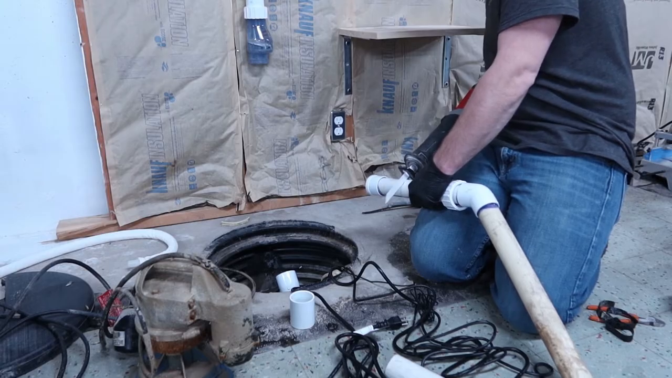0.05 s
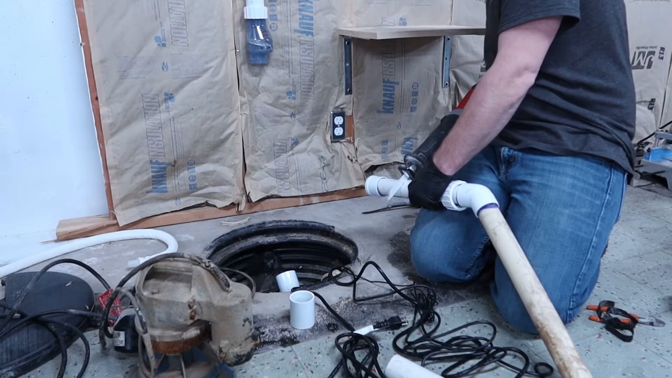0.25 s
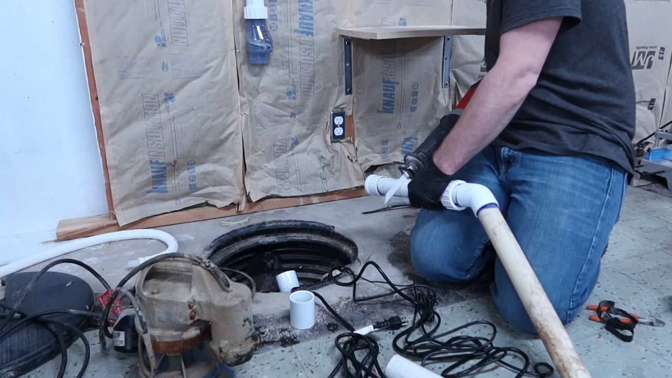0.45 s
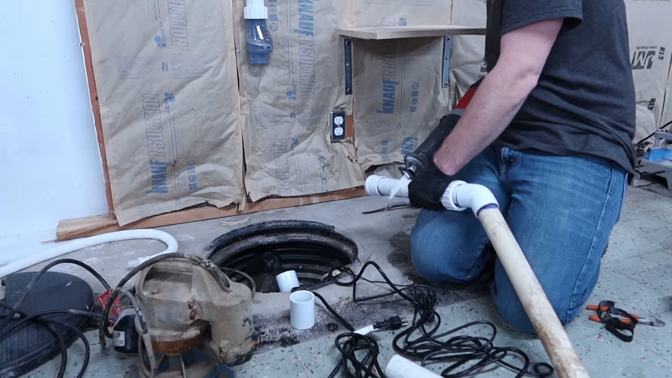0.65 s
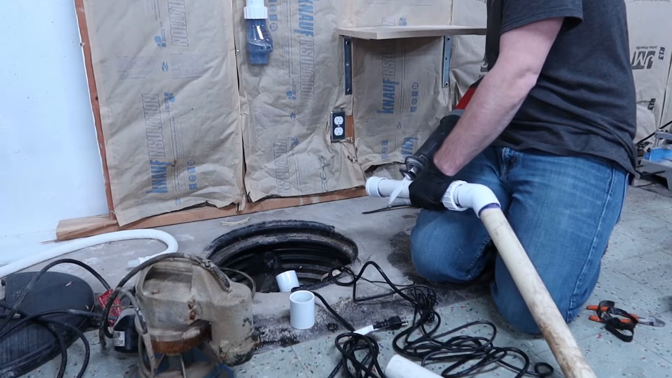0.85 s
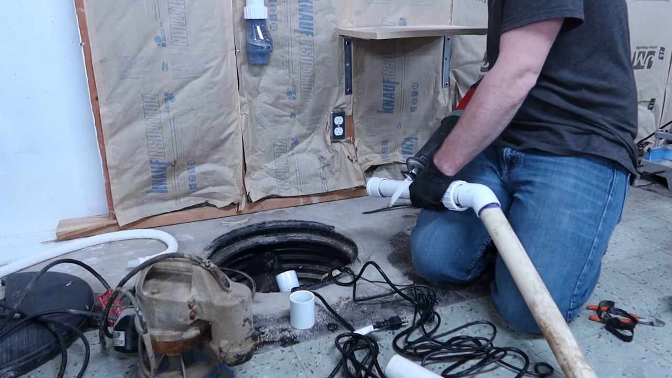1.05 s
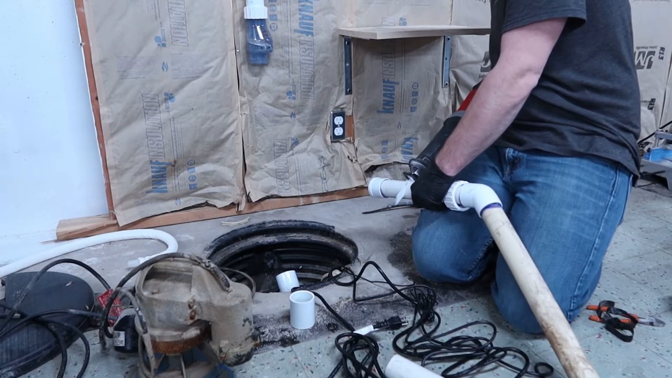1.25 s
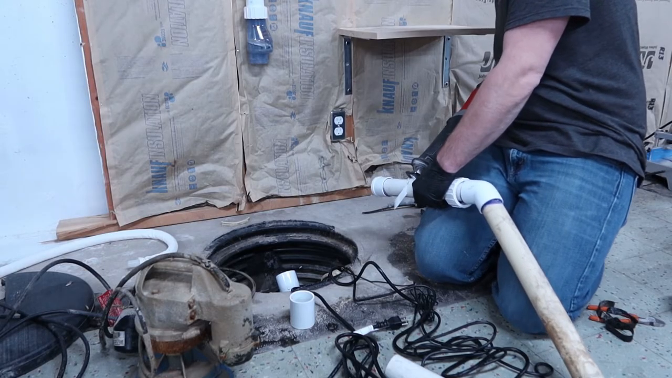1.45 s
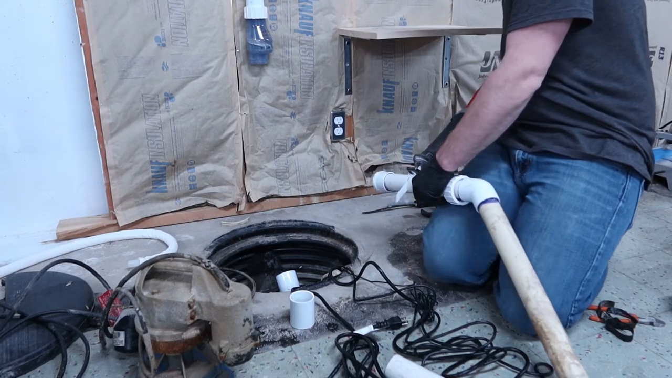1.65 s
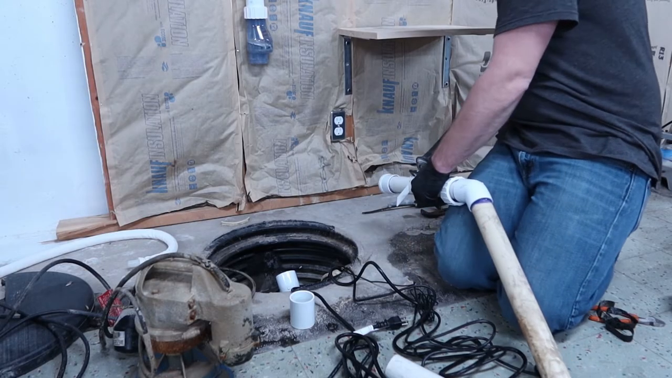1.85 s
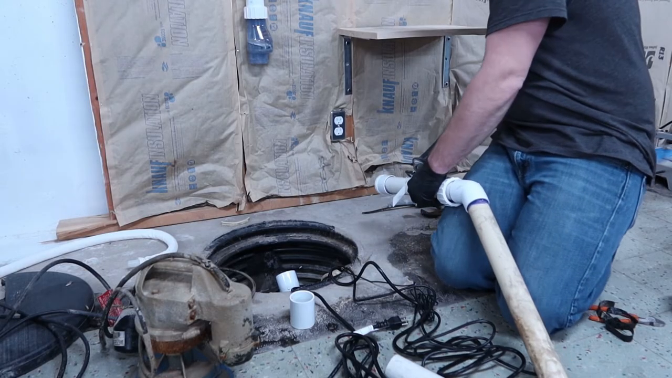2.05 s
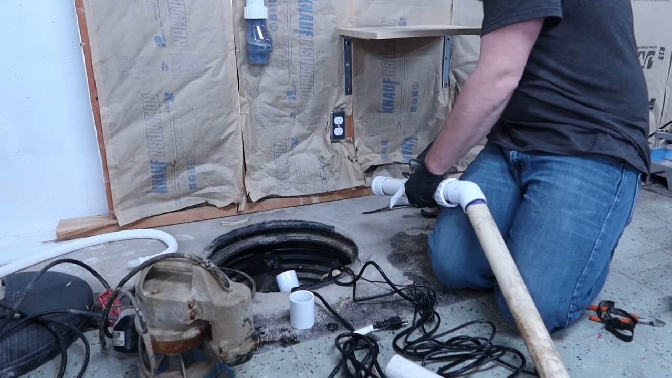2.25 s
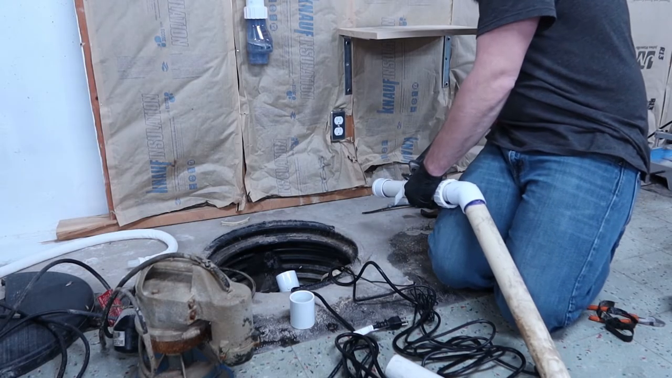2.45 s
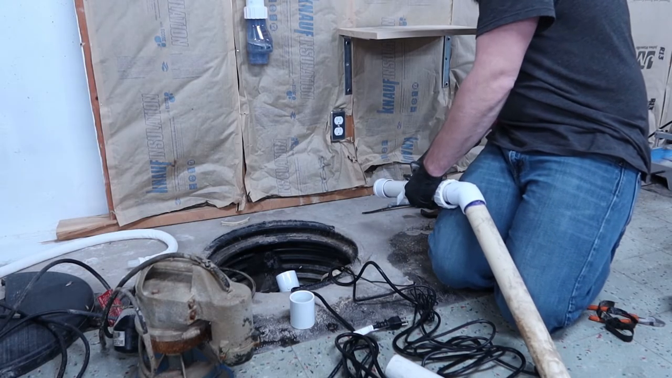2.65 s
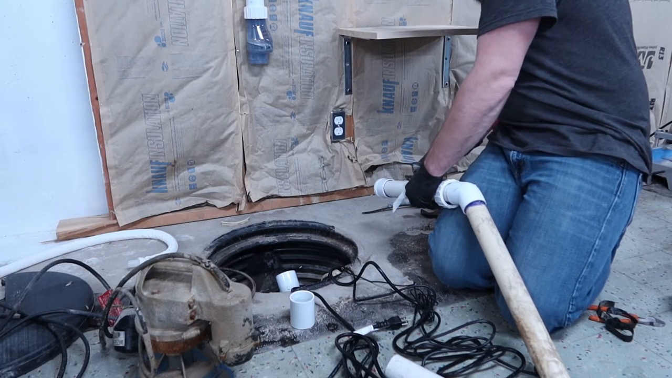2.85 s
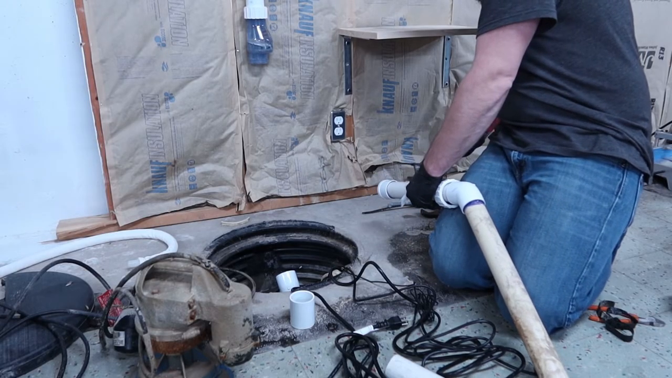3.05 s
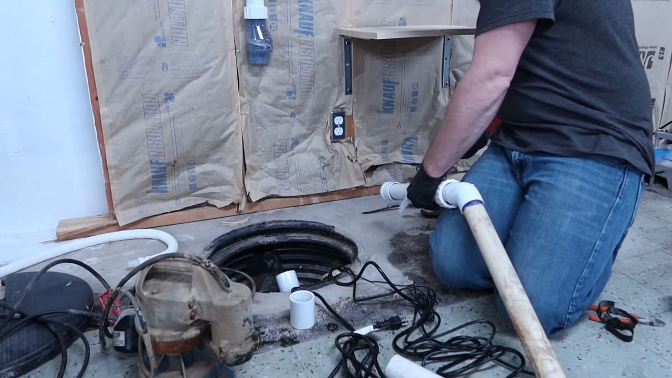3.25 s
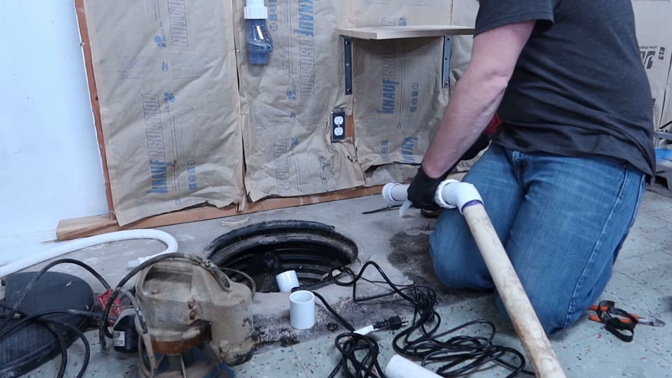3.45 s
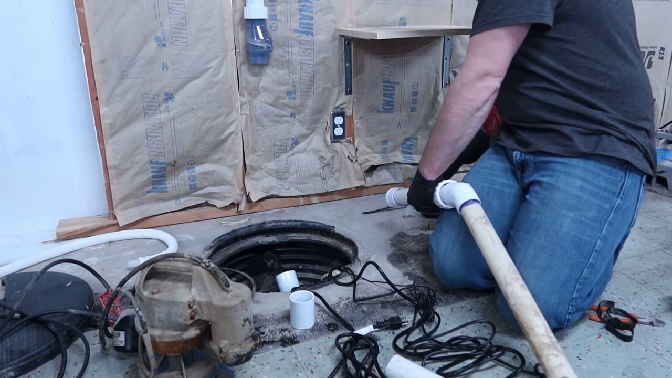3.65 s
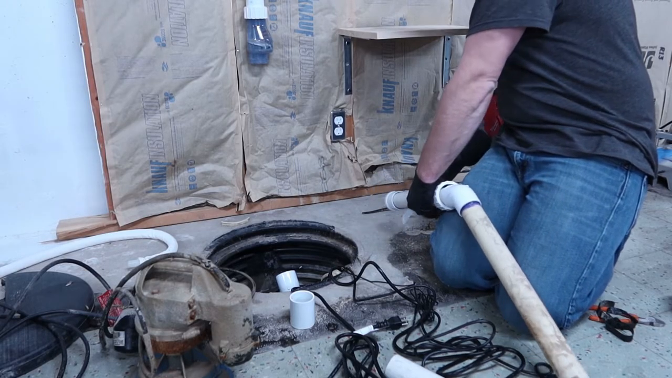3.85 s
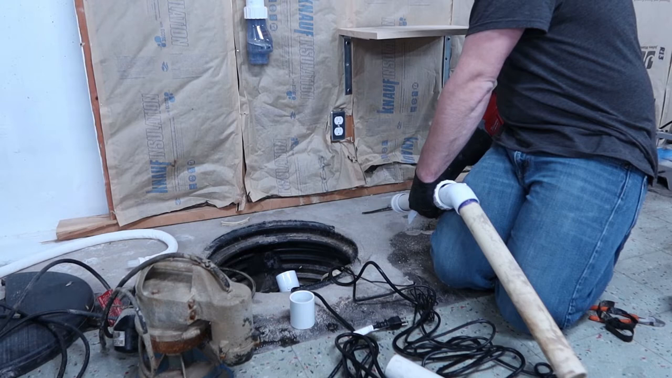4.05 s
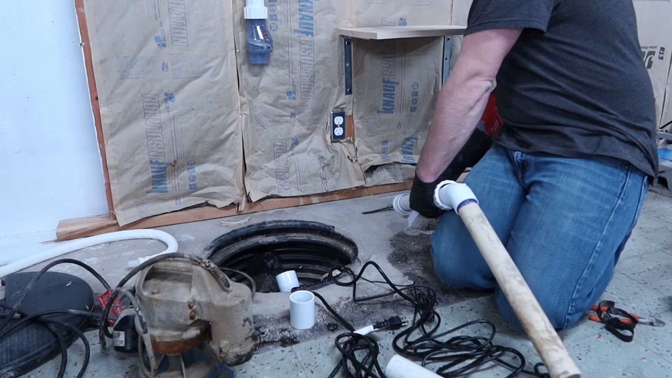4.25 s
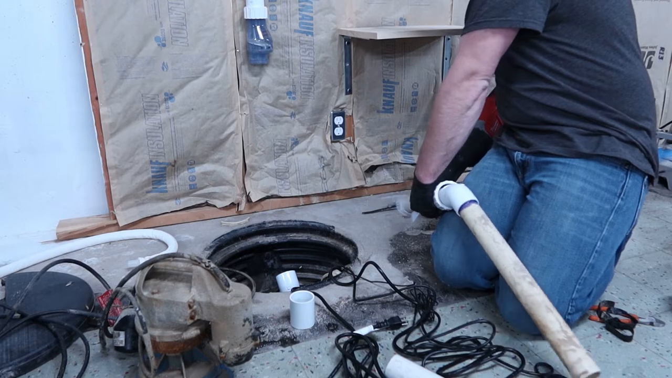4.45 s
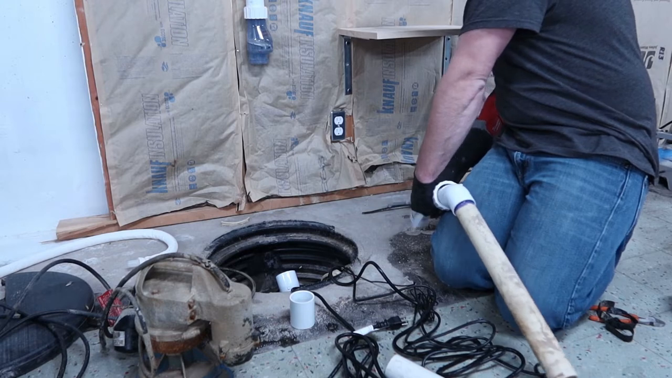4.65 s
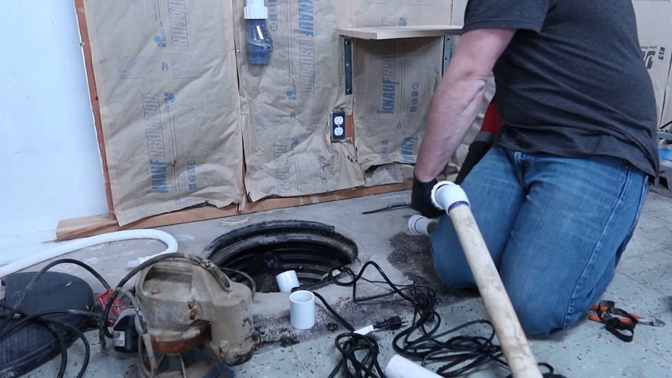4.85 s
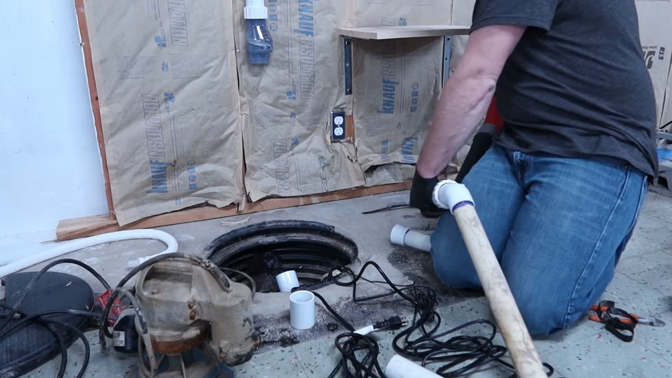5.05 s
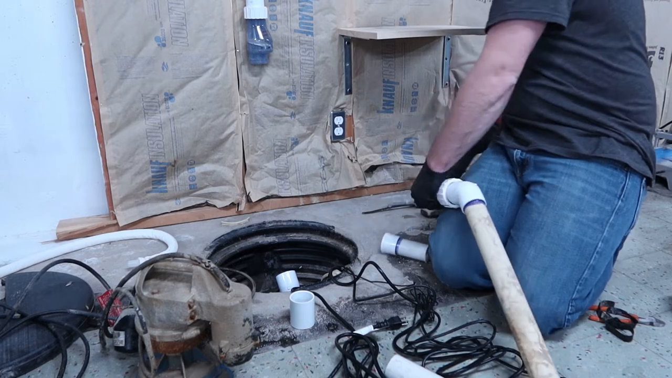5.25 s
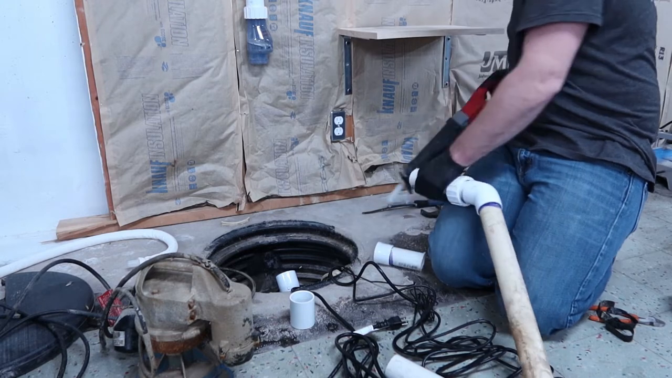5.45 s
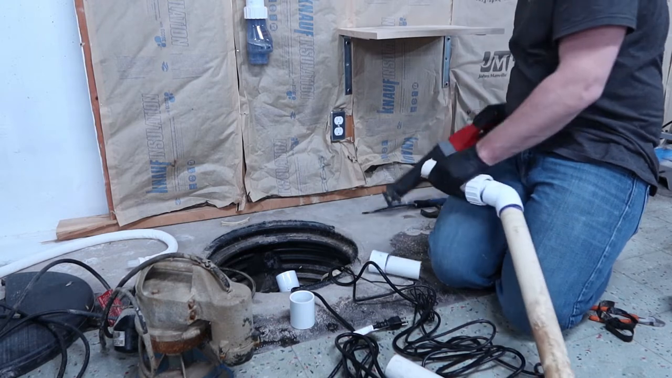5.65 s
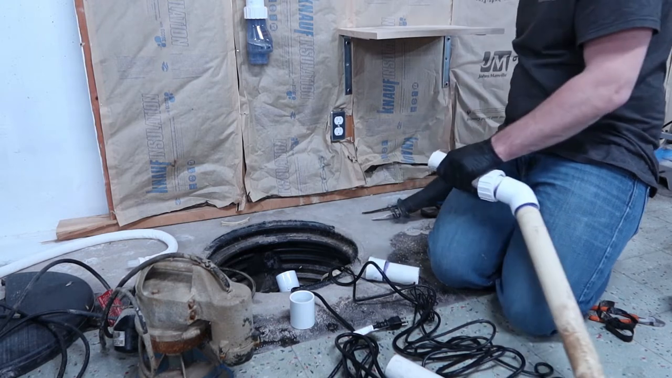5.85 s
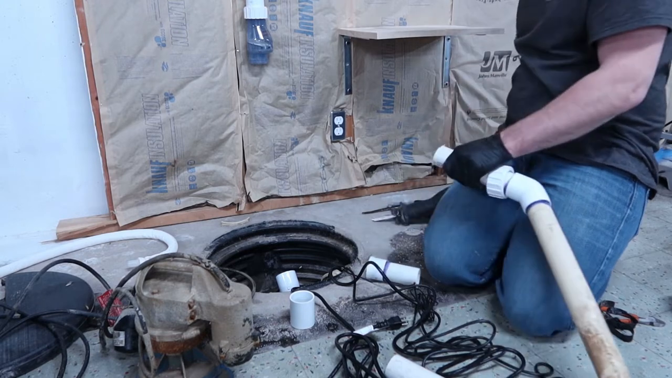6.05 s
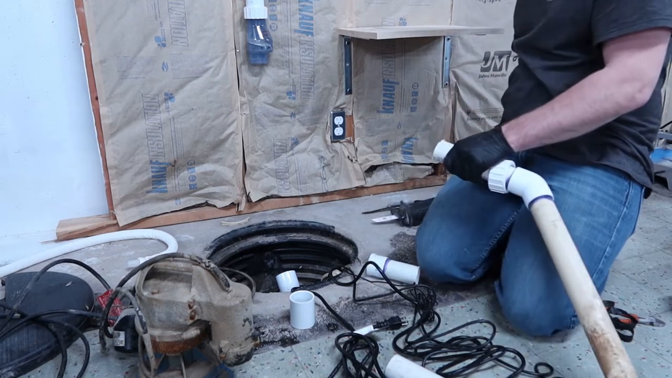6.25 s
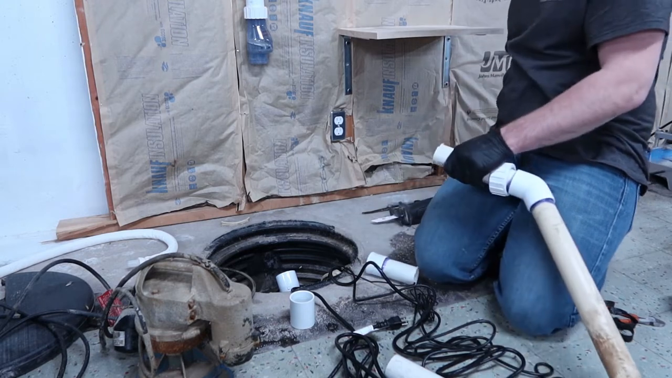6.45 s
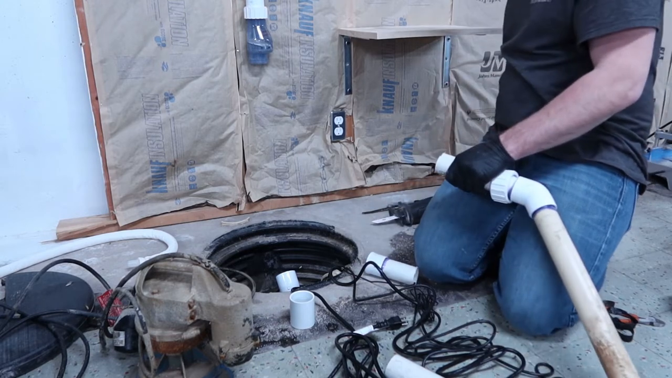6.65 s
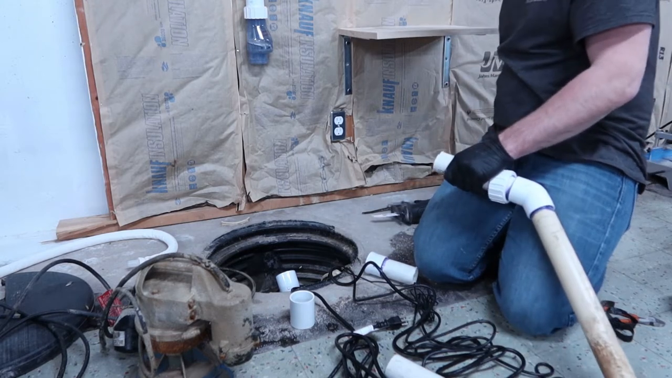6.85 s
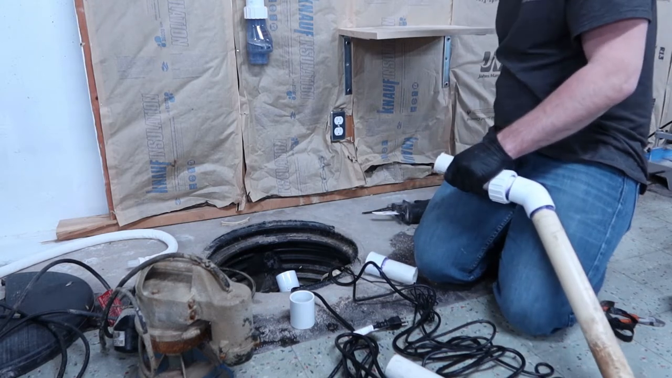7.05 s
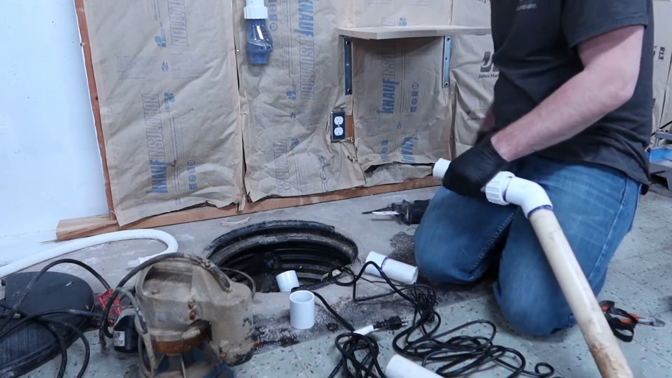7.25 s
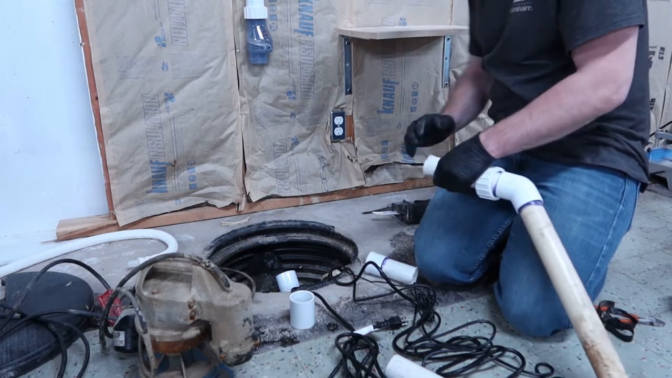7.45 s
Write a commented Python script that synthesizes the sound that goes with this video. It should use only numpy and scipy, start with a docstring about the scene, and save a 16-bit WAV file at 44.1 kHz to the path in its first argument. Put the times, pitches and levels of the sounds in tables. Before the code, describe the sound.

Close, loud power-saw strokes chew plastic pipe in a basement, stop, restart twice, then the saw is set down and pipe pieces are handled.

```python
"""A reciprocating saw is already cutting a plastic pipe in a basement: the motor growls and whirrs, each pull
stroke rasps and rings the wall. Three runs; then the saw is laid on concrete, the pipe knocked and handled.
Motor, rasp, drag and rubbing: filtered noise and random clicks. Impacts: clicks into decaying modes.
Squeaks and speed-control whine: sines. Reflections on the contact sounds, steady room tone, microphone."""
import sys
import numpy as np
from scipy import signal
from scipy.fft import rfft, irfft, next_fast_len
from scipy.io import wavfile
from scipy.ndimage import uniform_filter1d

SR = 44100
rng = np.random.default_rng(int(sys.argv[2]) if len(sys.argv) > 2 else 0)


def master_out(mix):
    """Clip the mix to full scale and print it as 16-bit PCM to the path in sys.argv[1]."""
    frames = np.transpose(np.atleast_2d(mix))
    ceiling = np.clip(frames, -1, 1)
    pcm = np.round(ceiling * 32767).astype(np.int16)
    wavfile.write(sys.argv[1], SR, pcm)


N = 331191

# room tone spectrum: f/Hz, relative density/dB
ROOM_TONE_SPECTRUM = [(20, 1), (60, 2), (130, -5.5), (200, -7), (245, -2.5), (300, -7), (500, -7),
                      (1000, -14.5), (1600, -18.5), (3000, -20.5), (8000, -21.5), (11000, -21.5),
                      (15800, -32.5)]
ROOM_TONE_DB = -54

# trigger runs: full speed reached t/s, trigger released t/s
TRIGGER_RUNS = [(-.5, 1.751), (2.506, 4.1), (4.462, 5.1)]
SPIN_UP_DB_PER_S, COAST_DB_PER_S, WHIRR_DB_PER_SPEED_DB = 424, 127, 1.24
POWER_OFF_DROP_DB, POWER_OFF_TAU_S = 5, 0.011

# motor and gears under load, at full speed: t/s, growl level/dB, whirr level/dB
MOTOR_LEVELS = [(0, -18.5, -24), (.55, -22.5, -22), (1.0, -23.5, -27.5), (1.72, -30.5, -26),
                (2.51, -23.5, -28), (2.7, -26.5, -24), (3.6, -22, -22.5), (4.07, -25.5, -28.5),
                (4.46, -21.5, -25), (4.52, -18.5, -17), (4.57, -26, -25), (4.68, -17.5, -15.5),
                (4.85, -24, -21.5), (5.1, -27.5, -27)]
# growl spectrum: f/Hz, relative density/dB
GROWL_SPECTRUM = [(35, -65.5), (60, -34.5), (219, -40), (289, -11.5), (457, -3), (938, 3), (1120, 2),
                  (1320, 3), (1660, -1.5), (1900, 1), (3000, -6), (3900, -16.5), (6600, -120)]
# whirr spectrum: f/Hz, relative density/dB
WHIRR_SPECTRUM = [(1180, -58), (2000, -2.5), (2340, 4), (5160, 5.5), (6390, 5.5), (8490, 1), (10300, -4),
                  (13200, -5.5), (15600, -15.5)]
# low hum of the motor and pipe notes shaken by the saw: f/Hz, start t/s, end t/s, level re growl/dB
SHAKEN_NOTES = [(203.8, 0.54, 2.7, -18), (405.6, 0.29, 1.8, -14.5), (434, 2.7, 3.45, -3),
                (238, 4, 4.57, -10)]
SHAKE_FADE_DB_PER_S, SHAKE_SWING_DB = 17, 10

# cutting strokes: t/s, level/dB, length/s, wall ring f/Hz
CUT_STROKES = [(0.043, -4, 0.033, 1450), (0.076, -0.5, 0.012, 1520), (0.153, 2, 0.022, 1480),
               (0.234, -1.5, 0.031, 1475), (0.336, -3, 0.039, 1400), (0.416, 1.5, 0.012, 1430),
               (0.478, -1.5, 0.026, 1370), (0.559, 4, 0.0095, 1410), (0.632, 0, 0.028, 1370),
               (0.711, 1.5, 0.023, 1470), (0.784, 0, 0.027, 1400), (0.859, 1, 0.023, 1170),
               (0.941, 1.5, 0.019, 1370), (1.016, -1.5, 0.032, 1310), (1.095, 0.5, 0.026, 1350),
               (1.174, -1, 0.032, 1320), (1.253, 0, 0.026, 1310), (1.328, 1, 0.027, 1280),
               (1.408, 1.5, 0.02, 1330), (1.48, 1.5, 0.024, 1220), (1.548, 1.5, 0.026, 1400),
               (1.622, 2, 0.02, 1440), (1.687, 0.5, 0.026, 1410), (2.508, -12, 0.022, 1440),
               (2.523, -5, 0.018, 1380), (2.538, -3, 0.02, 1360), (2.592, -5.5, 0.033, 1130),
               (2.628, -2, 0.033, 1350), (2.719, 0, 0.02, 1300), (2.797, -2.5, 0.027, 1260),
               (2.882, -2.5, 0.024, 1390), (2.962, -2, 0.023, 1300), (3.041, -2, 0.025, 1330),
               (3.116, -2.5, 0.028, 1310), (3.193, -2.5, 0.027, 1410), (3.268, -3, 0.024, 1280),
               (3.341, -2.5, 0.028, 1400), (3.417, -2, 0.019, 1350), (3.485, -1.5, 0.021, 1220),
               (3.551, -2.5, 0.031, 1250), (3.626, -1, 0.023, 1530), (3.706, 0, 0.025, 1520),
               (3.795, -1, 0.024, 1650), (3.877, -0.5, 0.021, 1550), (3.971, -4, 0.022, 1490),
               (4.041, -1.5, 0.023, 1480), (4.475, -3.5, 0.016, 1590), (4.668, -7, 0.04, 1460)]
# timbre as the cut deepens, re stroke level:
# t/s, wall ring level/dB, hollow level/dB, upper ring level/dB, rasp level/dB, low jolt level/dB
CUT_BALANCE = [(0, -10.5, -47, -30, -40, -28), (.55, -14.5, -23.5, -19.5, -28.5, -33.5),
               (.85, -12.5, -24.5, -19, -21, -33.5), (1.1, -9.5, -26, -14, -19.5, -57),
               (1.7, -12.5, -31.5, -17, -23, -46), (2.5, -8, -26, -9.5, -19.5, -36.5),
               (3.452, -10, -17, -10.5, -19, -52.5), (3.62, -17.5, -20.5, -11, -19, -37.5),
               (4.049, -17, -22.5, -17, -26, -36.5), (4.7, -45, -19.5, -19, -23.5, -35.5)]
# broad resonances of rasp, blade and wall together: f/Hz, width/Hz, level/dB
RASP_RESONANCES = [(2795, 600, 4), (3584, 760, 3.5), (5330, 2200, 1.5), (8270, 1300, 0.5),
                   (12100, 1400, -13)]
# air and wall notes of the pipe: f/Hz, width/Hz, level/dB
HOLLOW_NOTES = [(453.4, 67, -11), (562, 218, 6.5), (721.5, 110, -5)]
# wall ring broadens once the blade is through: t/s, width/Hz
WALL_RING_WIDTH = [(0, 170), (.9, 340), (4.7, 380)]
# low jolt drops as the pipe comes loose: t/s, f/Hz
JOLT_PITCH = [(0, 147), (3.5, 140), (3.7, 100), (4.7, 110)]
UPPER_RING_HZ, UPPER_RING_WIDTH_HZ, JOLT_WIDTH_HZ, RING_SCATTER_DB = 1952, 590, 51, 1.2
BITE_S, RELEASE_POWER = .006, 4
JUDDER_PER_S, JUDDER_DB = 110, 1.8   # teeth catch unevenly within a stroke

# blade dragging in the kerf, at full speed: t/s, level/dB
DRAG_LEVEL = [(0, -23), (.7, -22), (1.1, -30.5), (2.5, -35), (4.05, -32.5), (4.3, -72)]
# notes the drag rings: f/Hz, width/Hz, level/dB
DRAG_RESONANCES = [(1143, 240, -5), (1550, 160, -1.5), (2950, 530, -2.5), (3675, 190, -9), (6190, 1800, -9)]
RETURN_LEAD_S, RETURN_HALF_S, RETURN_DB, RETURN_HZ, RETURN_WIDTH_HZ = 0.017, .014, -31.5, 1150, 420

# handling ticks, gloves on plastic: t/s, squeak level/dB, squeak f/Hz, bright snap level/dB
HANDLING_TICKS = [(2.295, -38.5, 1420, -61), (2.302, -43, 1080, -75), (2.339, -47, 1067, -63),
                  (2.395, -62, 1130, -48), (4.2934, -62, 1390, -47), (4.307, -59, 1015, -49),
                  (4.352, -64, 1480, -53), (4.384, -38.5, 1110, -50), (5.158, -49, 1480, -41),
                  (5.21, -46, 1070, -65), (5.253, -55, 1060, -53), (5.3678, -54, 1010, -46.5),
                  (5.4116, -42, 1080, -47), (5.443, -49, 967, -50), (5.5342, -52, 1090, -50),
                  (5.5466, -46.5, 1120, -75), (5.6281, -48, 1080, -61), (5.724, -42.5, 1088, -49),
                  (6.326, -62, 1440, -49), (6.3526, -44, 1120, -56), (6.379, -48, 1115, -70.5),
                  (6.4245, -52, 1056, -68), (6.4694, -51.5, 1130, -72.5), (6.9357, -49, 1144, -50),
                  (7.173, -39, 1144, -54.5), (7.4476, -45, 1120, -53), (7.479, -57, 1130, -53.5)]
# snap modes: f/Hz, level/dB, t60/s
SNAP_MODES = [(1942, 1, .04), (3045, 1, .025)]
SQUEAK_S, SQUEAK_SAG_HZ_PER_S, SQUEAK_ROUGH_DB, SQUEAK_ROUGH_PER_S = .028, 1500, 4.5, 120.5

# speed-control whine as the trigger is squeezed: start t/s, end t/s, level/dB
WHINE_SPANS = [(2.378, 2.51, -40), (4.378, 4.48, -41)]
WHINE_HZ = 7590
# gears groan taking up the load: start t/s, end t/s, level/dB
GROAN_SPANS = [(2.445, 2.5, -43), (4.425, 4.5, -29)]
GROAN_HZ, GROAN_WIDTH_HZ = 840, 150

# blade snagging on the nearly severed pipe: t/s, level/dB
SNAG_BLOWS = [(3.789, -8), (3.873, -8), (3.967, -1.5), (4.036, -7.5), (4.172, -18), (4.479, -12),
              (4.537, 0), (4.579, -12), (4.61, -14), (4.728, -4), (4.799, -13)]
# modes of the stub: f/Hz, level/dB, t60/s
STUB_MODES = [(450, -11, .025), (620, -10, .025), (1550, -3, .02), (1850, -6, .012), (2150, -3, .012),
              (3300, -8, .012)]

# long pipe knocked: t/s, level/dB, crack level re blow/dB, favoured f/Hz
KNOCK_BLOWS = [(5.443, -39, -5, 460), (6.472, -45, -10, 460), (6.564, -14.5, -22, 250),
               (6.5658, -20.5, -24, 470), (6.5755, -17, -1, 900), (6.585, -19.5, -11, 1300),
               (6.594, -14, -15, 600)]
# pipe modes: f/Hz, level/dB, t60/s
PIPE_MODES = [(237, -5, .42), (400, -12, .06), (458, -8, .28), (640, -6, .07), (1303, -5, .06)]

# saw bouncing on concrete; the contact point sets the favoured notes:
# t/s, blade ring level/dB, favoured f/Hz, housing thud level/dB
SAW_BOUNCES = [(5.769, -29, 5000, -40), (5.775, -21, 3600, -27), (5.788, -28, 3600, -38),
               (5.812, -25, 7300, -30), (5.818, -26, 9500, -46), (5.827, -19, 13800, -52),
               (5.835, -13, 13800, -58), (5.837, -15, 4400, -58), (5.856, -17, 4500, -49),
               (5.867, -15, 4400, -52), (5.869, -19, 7300, -60), (5.877, -30, 5300, -36),
               (5.899, -12, 8500, -49), (5.9005, -16, 4400, -60), (5.917, -30, 5300, -38),
               (5.981, -30, 2750, -46), (6.031, -42, 13800, -56), (6.076, -29, 3630, -62),
               (6.082, -33, 5030, -62), (6.104, -60, 2750, -46), (6.159, -59, 2750, -49)]
# blade modes: f/Hz, level/dB, t60/s
BLADE_MODES = [(2756, -8, .04), (3630, -7, .03), (4414, -5, .03), (5030, -9, .04), (5300, -9, .035),
               (6196, -11, .03), (7284, -6, .028), (8484, -5, .018), (9500, -7, .022), (10850, -8, .02),
               (12520, -6, .02), (13800, -5, .02), (14300, -6, .016)]
# housing modes: f/Hz, level/dB, t60/s
HOUSING_MODES = [(437, 3.5, 0.037), (790, 5.5, 0.026), (1314, 8.5, 0.026), (1630, 10.5, 0.013)]

# glove and pipe sliding: middle t/s, half length/s, level/dB, tilt/(dB per octave)
SLIDE_STROKES = [(6.715, 0.24, -46, 2), (7.075, 0.065, -45, -5), (7.255, 0.05, -53, 7)]
# sliding resonances: f/Hz, width/Hz, level/dB
SLIDE_RESONANCES = [(1290, 1930, 2), (2850, 2800, 0), (4030, 1400, -5), (5700, 1800, -22), (8400, 3200, -5),
                    (12400, 4600, -9)]
SLIDE_FADE_DB, SLIDE_TILT_PIVOT_HZ = 18, 4200   # fade reached one half length from the middle

# hard plastic fitting clacking: t/s, level/dB, favoured f/Hz
CLACK_BLOWS = [(7.0235, -27, 2100), (7.043, -28, 1690), (7.0507, -11, 5740), (7.0554, -14.5, 2130),
               (7.063, -14, 2040), (7.1712, -24, 1900)]
# fitting modes: f/Hz, level/dB, t60/s
FITTING_MODES = [(480, -14, .05), (1460, -12, .04), (1674, -11, .04), (1900, -11, .04), (2100, -8, .04),
                 (2250, -10, .04), (3600, -12, .03), (5590, -7, .03), (5810, -7, .03), (6800, -13, .025),
                 (7200, -13, .025), (8600, -13, .025), (9900, -15, .025), (12600, -21, .025)]

BLOW_SCATTER_DB, FAVOUR_DB_PER_OCTAVE, FAVOUR_FLOOR_DB = 2.5, 36, -14
BASEMENT_T60_S, BASEMENT_DB, WALL_CUT_HZ = 0.45, -12, 12000
MIC_DIP_HZ, MIC_DIP_WIDTH_HZ, MIC_DIP_SHARE, CUTOFF_HZ = 10280, 2270, 0.52, 15700


def amp(db):
    """dB to gain."""
    return 10 ** (np.asarray(db) / 20)


def rms_one(x):
    """Scale to unit rms."""
    return x / np.sqrt(np.mean(x ** 2) + 1e-20)


def in_time(rows):
    """Columns of a table at every sample."""
    s, *columns = np.transpose(rows)
    return [np.interp(np.arange(N) / SR, s, c) for c in columns]


def coloured(x, spectrum):
    """Filter to a spectrum; rms 1."""
    hz, db = np.transpose(spectrum)
    size = next_fast_len(N)
    log_hz = np.log(np.fft.rfftfreq(size, 1 / SR) + 1)
    gain = amp(np.interp(log_hz, np.log(hz), db))
    return rms_one(irfft(rfft(x, size) * gain, size)[:N])


def flicker(rate_per_s, db):
    """Gain wandering at about the rate; db is its rms swing."""
    r = np.exp(-2 * np.pi * rate_per_s / SR)
    wander = signal.lfilter([1], [1, -2 * r, r * r], rng.standard_normal(N + SR))[SR:]
    return amp(db * rms_one(wander))


def grains(count, per_s, spread_db):
    """Random clicks of uneven size; rms 1."""
    sizes = amp(spread_db * np.minimum(rng.exponential(1, count), 4)) * rng.choice([-1, 1], count)
    return rms_one(sizes * (rng.random(count) < per_s / SR))


def resonate(x, hz, width_hz):
    """Two-pole resonance that keeps the rms of a white input."""
    r = np.exp(-np.pi * width_hz / SR)
    gain = np.sqrt((1 - r * r) / 2)
    return signal.lfilter([gain, 0, -gain], [1, -2 * r * np.cos(2 * np.pi * hz / SR), r * r], x)


def narrow(x, hz, width_hz):
    """Resonance applied twice for steep skirts; keeps the rms of a white input."""
    return resonate(resonate(x, hz, width_hz), hz, width_hz) * np.sqrt(2 * np.pi * width_hz / SR)


def ring(force, hz, width_hz):
    """Narrow resonance that hands on all the energy of one stroke."""
    return rms_one(narrow(force, hz, width_hz)) * np.sqrt(np.mean(force ** 2))


def gate(spans, rise_s):
    """Gain open inside each (start, end, dB)."""
    t = np.arange(N) / SR
    return sum(amp(db) * np.clip((t - a) / rise_s, 0, 1) * np.clip((b - t) / 0.0039, 0, 1)
               for a, b, db in spans)


def strike(times_s, levels_db, modes, rattle_s, crack_db, crack_t60_s, crack_hz, rattle_db=0,
           favoured_hz=None):
    """Each blow, a click with a brief rattle, excites modes unevenly and sets off a broad, fast-dying crack."""
    at, levels_db = (np.array(times_s) * SR).astype(int), np.array(levels_db)
    spread_db = rng.normal(0, BLOW_SCATTER_DB, (len(at), len(modes)))
    if favoured_hz is not None:
        octaves = np.abs(np.log2(np.array(modes)[:, 0] / favoured_hz[:, None]))
        spread_db = spread_db + np.maximum(-FAVOUR_DB_PER_OCTAVE * octaves, FAVOUR_FLOOR_DB)

    clicks = np.zeros(N)
    clicks[at] = amp(levels_db + crack_db)
    crack_decay = signal.lfilter([1], [1, -amp(-60 / (crack_t60_s * SR))], clicks + 1e-18)
    edges_hz = [crack_hz / 5, min(crack_hz * 3, .45 * SR)]
    band = signal.butter(2, edges_hz, "band", fs=SR, output="sos")
    out = signal.sosfilt(band, crack_decay * rng.standard_normal(N))

    rattle_grains = grains(count=N, per_s=2100, spread_db=0.0)
    for k, (hz, db, t60_s) in enumerate(modes):
        r, w = amp(-60 / (t60_s * SR)), 2 * np.pi * hz / SR
        clicks[at] = amp(levels_db + db + spread_db[:, k]) * (-1) ** k
        rattle_decay = signal.lfilter([1], [1, -np.exp(-1 / (rattle_s * SR))], clicks + 1e-18)
        rattle = rattle_decay * rattle_grains / np.sqrt(rattle_s * SR)
        drive = clicks + amp(rattle_db) * rattle
        out += signal.lfilter([0, np.sin(w)], [1, -2 * r * np.cos(w), r * r], drive)
    return out


def running():
    """Motor speed as dB below full: quick spin-up; on release a sharp drop, then a slower coast."""
    t, runs = np.arange(N) / SR, []
    for full_s, off_s in TRIGGER_RUNS:
        since_s = np.maximum(t - off_s, 0)
        spin_up_db = SPIN_UP_DB_PER_S * np.minimum(t - full_s, 0)
        drop_db = POWER_OFF_DROP_DB * (1 - np.exp(-since_s / POWER_OFF_TAU_S))
        runs.append(spin_up_db - COAST_DB_PER_S * since_s - drop_db)
    return np.max(runs, axis=0)


def surge():
    """0-1, up for a moment after each bite."""
    t = np.arange(N) / SR
    starts = np.transpose(CUT_STROKES)[0]
    since_s = t - starts[np.maximum(np.searchsorted(starts, t) - 1, 0)]
    return uniform_filter1d(np.exp(-np.abs(since_s) / .035), size=400)


def room_tone():
    """Steady diffuse noise with a slow, slight waver."""
    return amp(ROOM_TONE_DB) * coloured(rng.standard_normal(N), ROOM_TONE_SPECTRUM) * flicker(3, 0.46)


def low_notes():
    """Irregular jolts ring low notes, a motor hum and pipe notes, which swell with each stroke; level re growl."""
    t = np.arange(N) / SR
    jolts = rng.standard_normal(N) * flicker(4.1, 0.97)
    shaken = np.zeros(N)
    for hz, start_s, end_s, db in SHAKEN_NOTES:
        outside_s = np.maximum(0, np.maximum(start_s - t, t - end_s))
        shaken += amp(db - SHAKE_FADE_DB_PER_S * outside_s) * narrow(jolts, hz, 0.11 * hz)
    return shaken * amp(SHAKE_SWING_DB * (surge() - .75))


def motor():
    """Gear growl with low hum and shaken pipe notes, plus brush and fan whirr; levels follow speed."""
    (growl_db, whirr_db), speed_db = in_time(MOTOR_LEVELS), running()
    growl = coloured(grains(count=N, per_s=3400, spread_db=1.5), GROWL_SPECTRUM) * flicker(44, 2.3)
    whirr = coloured(grains(count=N, per_s=13000, spread_db=1.0), WHIRR_SPECTRUM) * flicker(23, 1.7)
    low = amp(growl_db + speed_db) * (growl + low_notes())
    return low + amp(whirr_db + WHIRR_DB_PER_SPEED_DB * speed_db) * whirr


def cutting():
    """Teeth bite densely while the blade pulls; wall, hollow and blade ring along."""
    out, size = np.zeros(N + SR), 6000
    t = np.arange(size) / SR
    teeth = grains(count=len(CUT_STROKES) * size, per_s=4000, spread_db=1.5).reshape(-1, size)
    judder = np.resize(flicker(JUDDER_PER_S, JUDDER_DB), teeth.shape)
    when, *columns = np.transpose(CUT_BALANCE)
    scatter_db = RING_SCATTER_DB * rng.standard_normal((len(CUT_STROKES), 2))
    for bites, (hollow_luck_db, upper_luck_db), stroke in zip(teeth * judder, scatter_db, CUT_STROKES):
        s, level_db, length_s, wall_hz = stroke
        wall_db, hollow_db, upper_db, rasp_db, jolt_db = (np.interp(s, when, c) for c in columns)
        wall_width_hz = np.interp(s, *np.transpose(WALL_RING_WIDTH))
        jolt_hz = np.interp(s, *np.transpose(JOLT_PITCH))

        # quick bite, softer release
        pull = np.clip(t / BITE_S, 0, 1) ** 0.31 * np.exp(-(t / length_s) ** RELEASE_POWER)
        force = amp(level_db) * rms_one(bites * pull) * np.sqrt(np.mean(pull ** 2))

        rasp = sum(amp(db) * resonate(force, hz, width_hz) for hz, width_hz, db in RASP_RESONANCES)
        rasp = rasp + amp(-5.0) * force
        sound = amp(rasp_db) * signal.lfilter([1, -1], [1, -.72], rasp)   # thins the bass
        sound += amp(wall_db) * ring(force, wall_hz, wall_width_hz)
        sound += amp(upper_db + upper_luck_db) * ring(force, UPPER_RING_HZ, UPPER_RING_WIDTH_HZ)
        for hz, width_hz, db in HOLLOW_NOTES:
            sound += amp(hollow_db + db + hollow_luck_db) * ring(force, hz, width_hz)
        sound += amp(jolt_db) * ring(force, jolt_hz, JOLT_WIDTH_HZ)
        start = max(int((s - .004) * SR), 0)
        out[start:start + size] += sound
    return out[:N]


def blade_drag():
    """Uneven rubbing in the kerf rings a few notes; falls twice as fast in dB as motor speed."""
    level = amp(in_time(DRAG_LEVEL)[0] + 2 * running())
    drag = grains(count=N, per_s=2400, spread_db=2.5) * flicker(30, 3.2) * level
    return sum(amp(db) * narrow(drag, hz, width_hz) for hz, width_hz, db in DRAG_RESONANCES)


def return_strokes():
    """The return stroke rubs more softly just before each bite."""
    s, db, *_ = np.transpose(CUT_STROKES)
    t = np.arange(6000) / SR
    hump = np.exp(-((t - t.mean()) / RETURN_HALF_S) ** 2)
    back = np.zeros(N)
    back[(np.maximum(s - RETURN_LEAD_S, 0) * SR).astype(int)] = amp(db + RETURN_DB)
    back = signal.fftconvolve(back, hump, "same") * amp(running())
    return narrow(back * grains(count=N, per_s=3300, spread_db=1.5), RETURN_HZ, RETURN_WIDTH_HZ)


def squeaks(rows):
    """Short rubbery notes, rough in level and sagging in pitch."""
    out, t = np.zeros(N + SR), np.arange(4000) / SR
    shape = np.clip(t / .002, 0, 1) * np.exp(-(t / SQUEAK_S) ** 2)
    for s, db, hz in rows:
        start = int(s * SR)
        cycles = (hz - SQUEAK_SAG_HZ_PER_S * (t / 2 - SQUEAK_S / 2)) * t
        out[start:start + len(t)] += amp(db) * shape * np.sin(2 * np.pi * cycles)
    return out[:N] * flicker(SQUEAK_ROUGH_PER_S, SQUEAK_ROUGH_DB)


def handling_ticks():
    """Gloves on plastic: a squeak and a bright snap together."""
    s, squeak_db, squeak_hz, snap_db = np.transpose(HANDLING_TICKS)
    snaps = strike(s, snap_db, SNAP_MODES, rattle_s=.004, crack_db=4.5, crack_t60_s=0.092, crack_hz=5000)
    return snaps + squeaks(zip(s, squeak_db, squeak_hz))


def speed_control_whine():
    """Steady sine with a faint second harmonic, gated."""
    phase = 2 * np.pi * WHINE_HZ * np.arange(N) / SR
    return gate(WHINE_SPANS, 0.036) * (np.sin(phase) + amp(-28.5) * np.sin(2 * phase))


def gear_groan():
    """Gears taking up the load: irregular noise through one resonance, gated."""
    jolts = rng.standard_normal(N) * flicker(4.1, 0.97)
    return gate(GROAN_SPANS, 0.0058) * narrow(jolts, GROAN_HZ, GROAN_WIDTH_HZ)


def blade_snags():
    """Blade blows on the nearly severed pipe excite short stub modes."""
    s, db = np.transpose(SNAG_BLOWS)
    return strike(s, db, STUB_MODES, rattle_s=0.003, crack_db=-2, crack_t60_s=0.022, crack_hz=2500)


def pipe_knocks():
    """Knocks ring the long pipe, each favouring some modes."""
    s, db, crack_db, favoured_hz = np.transpose(KNOCK_BLOWS)
    return strike(s, db, PIPE_MODES, rattle_s=0.0018, crack_db=crack_db, crack_t60_s=0.03, crack_hz=2960,
                  rattle_db=-14, favoured_hz=favoured_hz)


def saw_down():
    """At each bounce the blade modes jingle and the housing modes thud."""
    s, blade_db, favoured_hz, thud_db = np.transpose(SAW_BOUNCES)
    blade = strike(s, blade_db, BLADE_MODES, rattle_s=.007, crack_db=-7, crack_t60_s=.018, crack_hz=7500,
                   rattle_db=4.5, favoured_hz=favoured_hz)
    housing = strike(s, thud_db, HOUSING_MODES, rattle_s=0.0022, crack_db=9.0, crack_t60_s=0.09,
                     crack_hz=1210)
    return blade + housing


def sliding():
    """Glove and pipe rub: dense grains through broad resonances, swelling and fading."""
    t = np.arange(N) / SR
    rub = grains(count=N, per_s=13000, spread_db=3.0) * flicker(43.0, 0.46)
    out = np.zeros(N)
    for hz, width_hz, db in SLIDE_RESONANCES:
        note = narrow(rub, hz, width_hz)
        octaves = np.log2(hz / SLIDE_TILT_PIVOT_HZ)
        for mid_s, half_s, level_db, tilt_db in SLIDE_STROKES:
            fade_db = SLIDE_FADE_DB * ((t - mid_s) / half_s) ** 2
            out += note * amp(db + level_db + tilt_db * octaves - fade_db)
    return out


def fitting_clacks():
    """Blows ring the modes of a hard plastic fitting."""
    s, db, favoured_hz = np.transpose(CLACK_BLOWS)
    return strike(s, db, FITTING_MODES, rattle_s=.014, crack_db=-9, crack_t60_s=.11, crack_hz=2600,
                  favoured_hz=favoured_hz)


def basement(x):
    """Dense reflections that die away, duller than the direct sound."""
    t = np.arange(SR // 2) / SR
    tail = rng.standard_normal(len(t)) * amp(-60 * t / BASEMENT_T60_S) * (t > .004)
    tail = signal.lfilter(*signal.butter(1, WALL_CUT_HZ, fs=SR), tail)
    return signal.fftconvolve(x, tail / np.sqrt(np.sum(tail ** 2)))[:N]


def scene():
    """Contacts get the room; motor and room tone are already diffuse."""
    diffuse = room_tone() + motor() + speed_control_whine() + gear_groan()
    contacts = cutting() + blade_drag() + return_strokes() + handling_ticks() + blade_snags()
    contacts = contacts + pipe_knocks() + saw_down() + sliding() + fitting_clacks()
    return (contacts + amp(BASEMENT_DB) * basement(contacts) + diffuse)[None]


def record(dry):
    """Microphone: treble dip, peaks clipped, deep bass shed, top cut."""
    peak = signal.iirpeak(MIC_DIP_HZ, MIC_DIP_HZ / MIC_DIP_WIDTH_HZ, fs=SR)
    dipped = dry - MIC_DIP_SHARE * signal.lfilter(*peak, dry)
    clipped = np.clip(dipped, -.97, .97)
    thin = signal.sosfilt(signal.butter(1, 70, "high", fs=SR, output="sos"), clipped)
    return signal.sosfilt(signal.ellip(14, .5, 95, CUTOFF_HZ, fs=SR, output="sos"), thin)


dry = scene()
out = record(dry)
master_out(out)
```